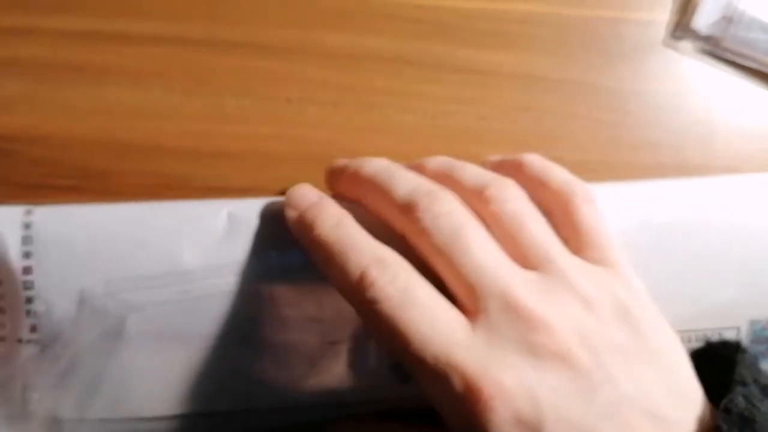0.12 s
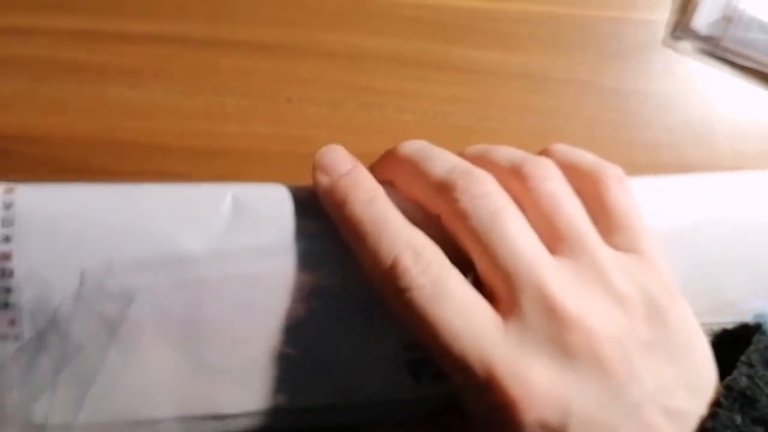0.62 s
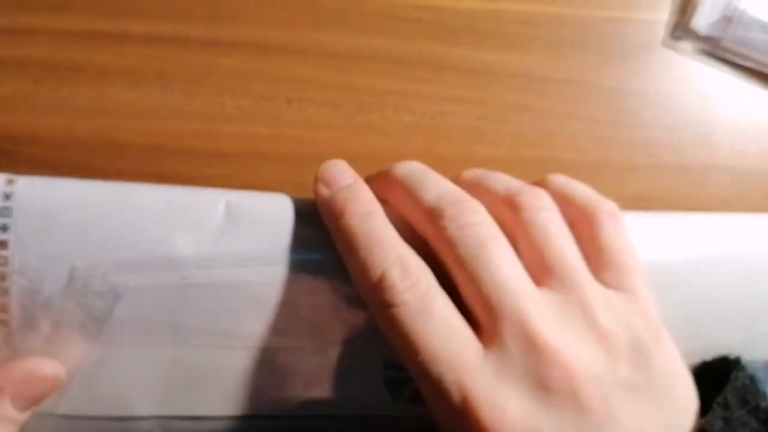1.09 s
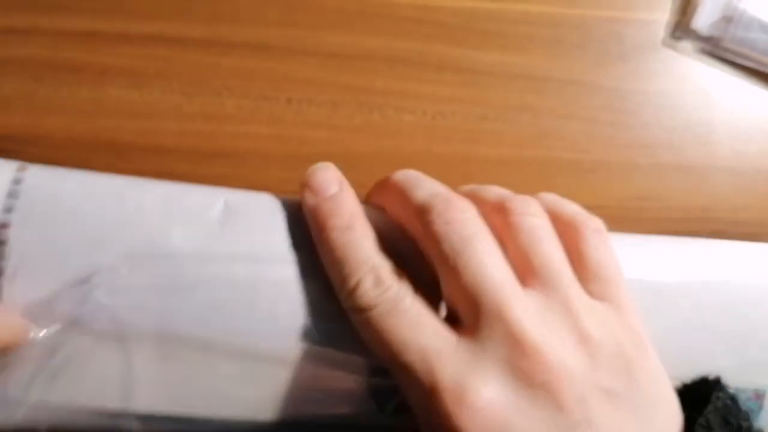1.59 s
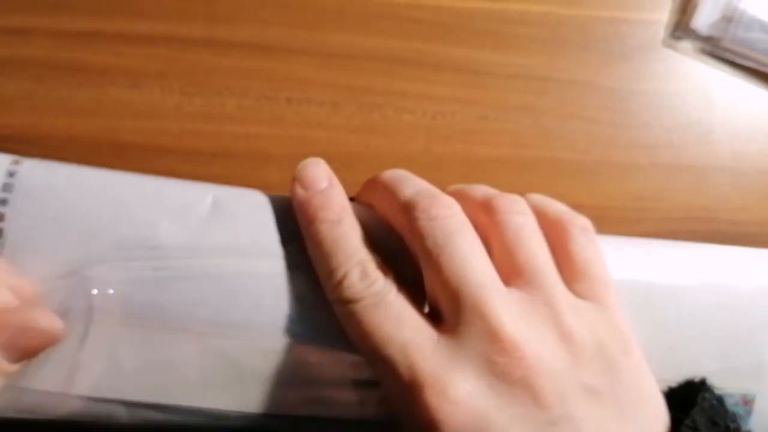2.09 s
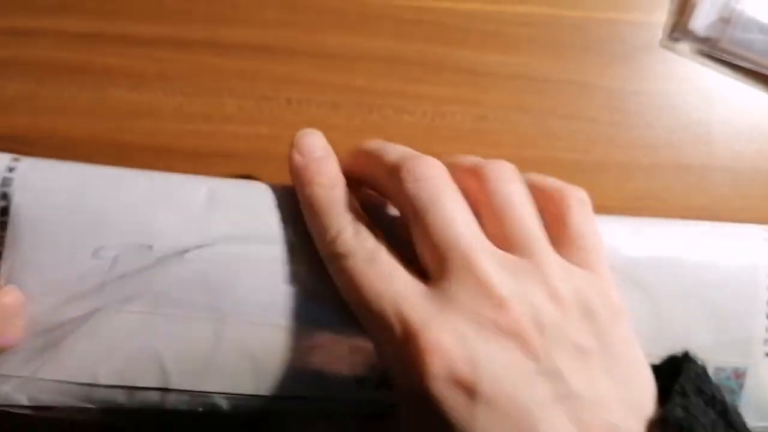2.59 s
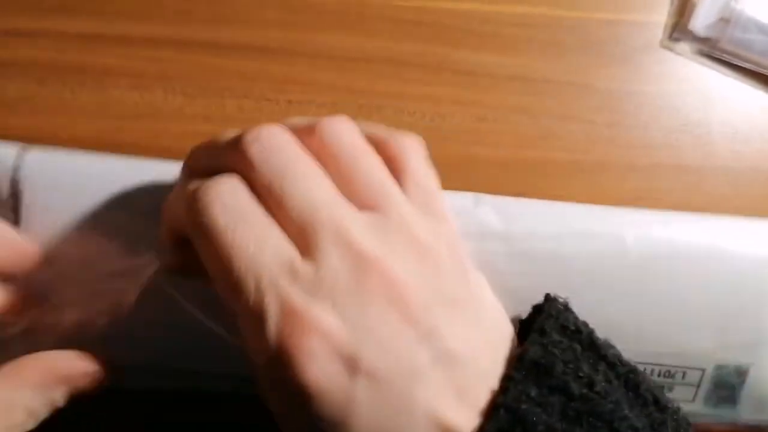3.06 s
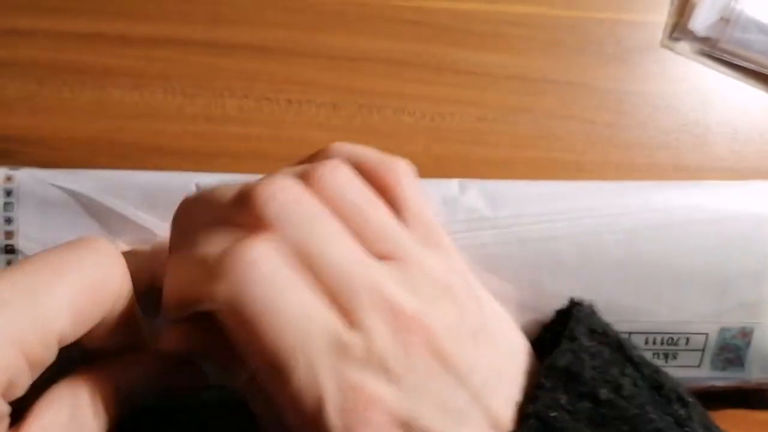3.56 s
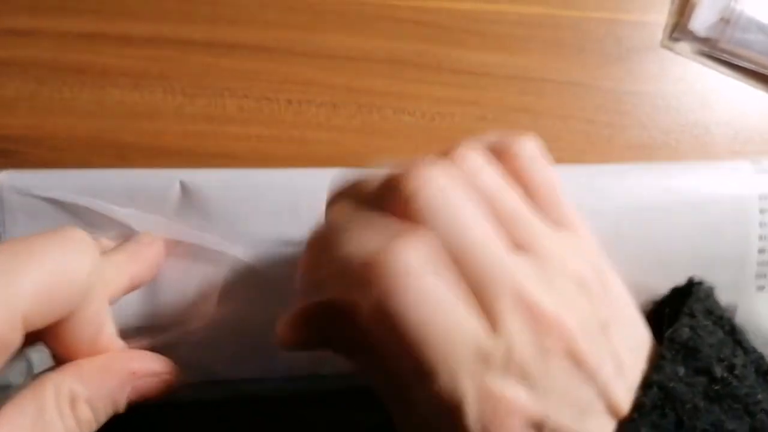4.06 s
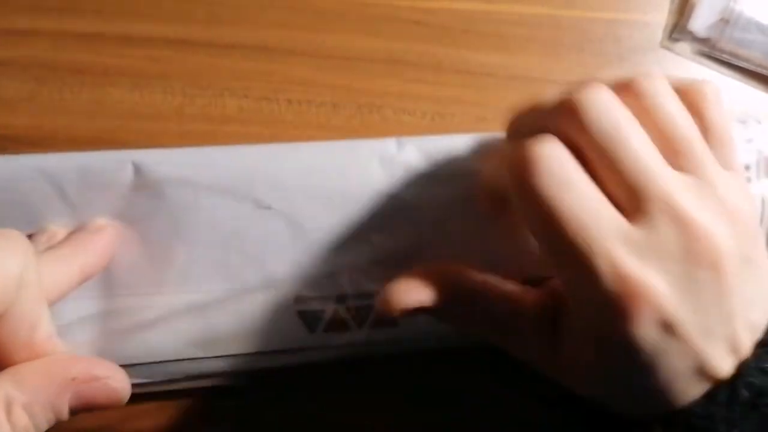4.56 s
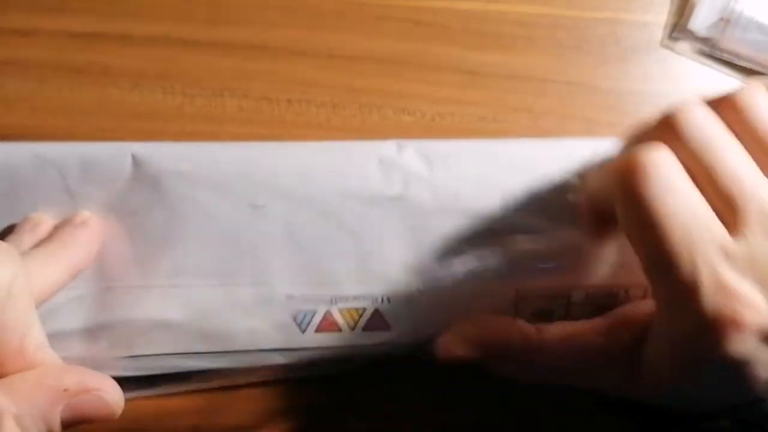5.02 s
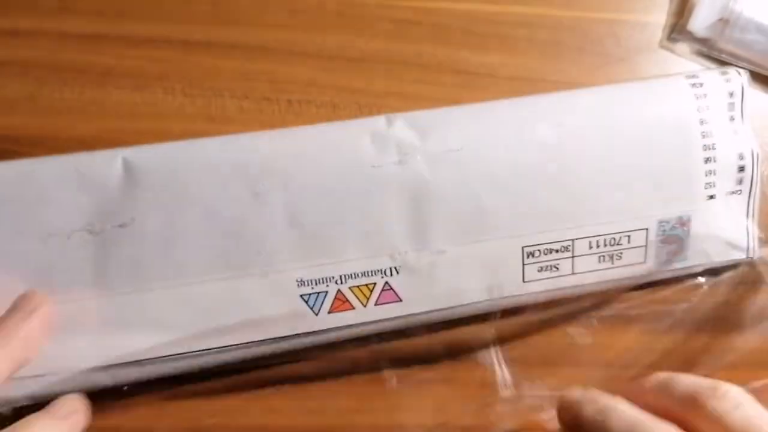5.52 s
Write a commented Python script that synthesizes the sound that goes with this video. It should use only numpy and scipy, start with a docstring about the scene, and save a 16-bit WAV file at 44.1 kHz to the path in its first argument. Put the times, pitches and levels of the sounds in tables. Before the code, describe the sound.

Close stereo pickup of two hands working thin plastic film around a rolled canvas on a wooden desk. Crinkling starts at once in strong, snappy bursts, thins briefly after one second, then returns. A single hard knock lands just before the middle, and the rustling carries on busily to the end over faint room hush and low desk rumble.

```python
"""Two hands unwrap thin plastic film from a rolled canvas on a wooden desk, close to a pair of microphones.
Squeezes crackle from the first moment as clumped clicks, with creases that snap as short rings and noise,
dull pops where fingers dent the roll, low desk rumble and soft thuds of a few low cycles. At 2.44 s a knock
rings as decaying tones and jolts the left microphone. The crackle goes on past a last thud at 5.49 s.
Filtered noise is the room's hush, and sparse echoes follow the film and the knock."""
import sys
import numpy as np
from scipy import signal
from scipy.io import wavfile
from scipy.ndimage import uniform_filter1d

SR = 44100
rng = np.random.default_rng(int(sys.argv[2]) if len(sys.argv) > 2 else 0)


def transcribe(signal):
    """Save signal, clipped to [-1, 1], as a 16-bit WAV file at the path in sys.argv[1]."""
    frames = np.atleast_2d(signal).T
    limited = np.clip(frames, -1, 1)
    pcm = np.round(limited * 32767).astype(np.int16)
    wavfile.write(sys.argv[1], SR, pcm)


def boost_factor(decibels):
    """Convert a level in decibels to a linear amplitude factor."""
    exponent = np.asarray(decibels, float) / 20
    return 10 ** exponent


N = 249165


def evened(x):
    """Scales to rms 1."""
    return x / np.sqrt(np.mean(x ** 2) + 1e-20)


def read(points, hz):
    """Reads a table on a log-frequency axis."""
    f, value = np.transpose(points)
    return np.interp(np.log(hz + 1), np.log(f + 1), value)


def coloured(x, points, share=1):
    """Filters by a spectrum in dB at minimum phase, so nothing rings before an attack."""
    db = share * np.maximum(read(points, abs(np.fft.fftfreq(4096, 1 / SR))), -100)
    log_gain = np.log(boost_factor(db))
    minimum_phase = -signal.hilbert(log_gain).imag
    taps = np.fft.ifft(np.exp(log_gain + 1j * minimum_phase)).real[:2048]
    return signal.oaconvolve(x, taps[None], axes=-1)[:, :x.shape[1]]


def add(mix, at, sound):
    """Adds a sound at a sample index."""
    part = mix[max(at, 0):][:len(sound)]
    part += sound[:len(part)]


def burst(hz, cycles, phase):
    """A few cycles that swell and die, peak 1; the swell lasts the given cycles."""
    turns = np.arange(600) / SR * hz
    swell = (turns / cycles * np.exp(1 - turns / cycles)) ** 2
    shape = swell * np.sin(2 * np.pi * (turns + phase))
    return shape / abs(shape).max()


# The busy hand wandering along the roll.
# Each row: time in seconds, left over right in dB, lateness of the left microphone in ms.
HAND_PATH = [(0, 5.5, 0.088), (.5, 9, .13), (1.1, 5, .11), (2, 4.5, 0.095), (2.6, 3, 0.1), (3.2, 4, 0.096),
             (3.8, 4, 0), (4.3, 4.5, -0.072), (4.8, 2.5, -.14), (5.65, 2.5, -0.16)]


def hand_at(s):
    """Left-right level in dB and left lag in ms for a hand nearer one microphone than the other."""
    times, pan_db, late_ms = np.transpose(HAND_PATH)
    return np.interp(s, times, pan_db), np.interp(s, times, late_ms)


# The grip shifting the note of the hollow roll. Each row: time in seconds, note in Hz.
GRIP_NOTES = [(0, 560), (.6, 505), (.9, 380), (1.5, 356), (2.3, 392), (2.9, 716), (5.65, 746)]


def roll_note(s):
    """Note in Hz of the hollow roll as the grip shifts."""
    return np.interp(s, *np.transpose(GRIP_NOTES))


# Each squeeze or pull of the film. Each row: peak time in seconds, crackle in dB, rise in ms per 10 dB,
# fade in ms per 10 dB, echo of the hollow roll relative to the crackle in dB, before hollow_share.
FILM_SQUEEZES = [(.084, -47, 45, 18, -20), (0.203, -38, 35.5, 67, -15.5), (.28, -47, 20, 38, -9),
                 (.366, -47.5, 14, 39, -20), (0.468, -41, 28, 29, -16), (0.576, -43, 66, 40, -11.5),
                 (.741, -56, 28, 5, -7), (.82, -44.5, 20, 73, -6.5), (.969, -53, 9, 45, -8),
                 (1.03, -55.5, 23, 30, -6.5), (1.16, -61, 12, 35, -14), (1.26, -58.5, 60, 62, -14),
                 (1.35, -48.5, 7, 125, -11), (1.467, -42.5, 50, 34, -8), (1.538, -46.5, 15, 65, -8.5),
                 (1.637, -43.5, 46, 41, -18), (1.715, -39, 37, 38.5, -12.5), (1.918, -47, 98, 57, -16.5),
                 (2.037, -56, 9, 19, -30), (2.103, -48.5, 12, 300, -13.5), (2.242, -49, 19, 20, -13),
                 (2.342, -47.5, 76, 86, -11.5), (2.44, -45, 15, 80, -13.5), (2.66, -53.5, 46, 250, -9.5),
                 (2.776, -49, 10, 46, -8), (2.913, -53.5, 87, 15, -11), (2.989, -50.5, 38, 130, -10.5),
                 (3.151, -42.5, 8.5, 45, -14), (3.299, -55, 137, 26, -9.5), (3.353, -49.5, 31, 212, -11.5),
                 (3.629, -50.5, 246, 65, -6), (3.847, -58, 31, 27, -10), (3.913, -45, 6.5, 102, -8),
                 (4.144, -45.5, 30, 26, -9), (4.256, -50.5, 3, 104, -9.5), (4.392, -43.5, 69, 75, -10),
                 (4.541, -41, 19.5, 35, -12), (4.695, -47, 52, 39, -11.5), (4.797, -43, 74, 39, -11),
                 (4.91, -45, 15, 31, -7.5), (4.94, -44, 36, 40, -13), (5.038, -49.5, 37, 10, -5),
                 (5.09, -50.5, 26, 48, -12), (5.185, -43, 70, 42, -7.5), (5.339, -46.5, 98, 68, -11.5),
                 (5.47, -48, 63, 58, -10.5), (5.549, -45.5, 16, 102, -12.5)]


def effort(rest_db, follow=1, hollow_share=0):
    """Level in dB of the squeezes, which rise, fade and overlap in power; lower follow is slower."""
    ms = np.arange(0, N, 64) / SR * 1000
    power = boost_factor(2 * rest_db)
    for s, db, rise_ms, fade_ms, roll_db in FILM_SQUEEZES:
        before = (s * 1000 - ms) / max(rise_ms, 2)
        after = (ms - s * 1000) / max(fade_ms, 2)
        away = np.maximum(before, after)
        power = power + boost_factor(2 * (db + hollow_share * roll_db - 10 * follow * away))
    return np.interp(np.arange(N) / SR * 1000, ms, 10 * np.log10(power))


# Colour of the room noise ahead of its overall level. Each row: frequency in Hz, relative dB per Hz.
HUSH_COLOUR = [(35, -33), (60, 6), (233, -10.5), (274, -3), (842, -41), (1550, -24), (1950, -2.5),
               (9790, -40), (16000, -45)]


def hush():
    """Steady room noise, filtered independently for each microphone."""
    return boost_factor(-71.5) * evened(coloured(rng.standard_normal((2, N)), HUSH_COLOUR))


# Sparse echoes dying away in the room. Each row: frequency in Hz, 60 dB decay time in seconds.
ROOM_DECAY = [(300, 0.12), (1000, 0.097), (4000, 0.065), (12000, 0.14)]


def room(x):
    """Sparse echoes of random sign from desk and walls; three sets of paths sway at a steady rate."""
    sway_hz, out = 2.3, 0
    sway = 2 * np.pi * sway_hz * np.arange(N) / SR
    for k in range(3):
        taps = np.zeros((2, SR // 2))
        # one echo at a random place in every 20 samples
        at = np.arange(60, SR // 2 - 20, 20) + rng.integers(0, 20, (2, (SR // 2 - 61) // 20))
        np.put_along_axis(taps, at, rng.choice([-1., 1.], at.shape), 1)
        hz, t, z = signal.stft(taps, SR, nperseg=256)
        decay = boost_factor(-60 * t / read(ROOM_DECAY, hz)[:, None])
        tail = signal.istft(z * decay, SR, nperseg=256)[1]
        tail = tail / np.linalg.norm(tail[0])
        fed = x.mean(0) * np.sqrt(2 / 3) * np.cos(sway + k * np.pi / 3)
        out = out + signal.fftconvolve(fed[None], tail, axes=1)[:, :N]
    return out


# Colour of the desk rocking, then of its top humming. Each row: frequency in Hz, relative dB per Hz.
ROCKING_COLOUR = [(12, -20), (30, -1), (48, 1.5), (75, -9), (150, -43)]
HUMMING_COLOUR = [(40, -48), (75, -7), (118, -2), (160, -9.5), (240, -14.5), (400, -43)]
# How hard the hands lean on the desk.
# Each row: time in seconds, rocking in dB, humming in dB, both at a crackle of -50 dB.
HANDS_LEAN = [(0, -68, -50.5), (.15, -86, -77), (.5, -90, -86), (.6, -61, -69), (.74, -60, -74),
              (.8, -70.5, -69.5), (1.3, -77, -80), (1.42, -66, -70), (1.6, -80, -76), (1.9, -86, -70),
              (2.12, -70, -76), (2.35, -91, -86), (2.5, -72, -61), (2.72, -74, -64), (2.9, -78, -90),
              (3.1, -80, -78), (3.2, -80, -59.5), (3.4, -82, -73), (3.55, -76, -63), (4.0, -70, -67),
              (4.5, -72, -61.5), (4.8, -64, -60.5), (5.1, -69, -63.5), (5.4, -69, -64.5), (5.49, -60, -73),
              (5.55, -63, -60), (5.65, -70, -68)]


def desk(effort_db):
    """Low rumble carried through the wood, nearly the same at both microphones."""
    middling_db, follow = -50, 0.61  # desk dB for each dB of squeeze
    s, *levels_db = np.transpose(HANDS_LEAN)
    out = 0
    for lean_db, colour in zip(levels_db, (ROCKING_COLOUR, HUMMING_COLOUR)):
        noise = rng.standard_normal((3, N))
        rumble = evened(coloured(noise[0] + 0.32 * noise[1:], colour))
        level_db = np.interp(np.arange(N) / SR, s, lean_db) + follow * (effort_db - middling_db)
        out = out + boost_factor(level_db) * rumble
    return out


# The roll settling on the desk.
# Each row: time of the middle in seconds, peak of the swell in dB, frequency in Hz.
ROLL_THUDS = [(.02, -51, 128), (.03, -63, 32), (.64, -51.5, 44.7), (1.411, -64, 46), (3.917, -55, 200),
              (5.49, -59, 48)]


def thuds():
    """Soft low swells of a few cycles through the desk, the same at both microphones."""
    t, out = np.arange(N) / SR, 0
    for s, db, hz in ROLL_THUDS:
        swell = np.exp(-((t - s) * hz / 2.3) ** 2)
        out = out + boost_factor(db) * swell * np.sin(2 * np.pi * hz * (t - s))
    return out


# Tones of the knock as they start at the left microphone, ahead of a brief onset.
# Each row: frequency in Hz, level in dB, 60 dB decay time in seconds.
KNOCK_TONES = [(3950, -15, 0.013), (2550, -22, 0.012), (5500, -13, 0.0048), (9340, -14, 0.0051),
               (1600, -27, 0.0093)]


def knock():
    """A hard tick at both microphones; the left diaphragm is pushed aside and creeps back."""
    knock_s, jolt_db, jolt_decay_s = 2.4372, -4, 0.0027
    t, out = np.arange(SR // 2) / SR, np.zeros((2, N))
    tick = sum(boost_factor(db - 60 * t / t60) * np.sin(2 * np.pi * hz * t) for hz, db, t60 in KNOCK_TONES)
    tick *= 1 - np.exp(-t / .00006)
    jolt = boost_factor(jolt_db) * (1 - np.exp(-t / .0001)) * np.exp(-t / jolt_decay_s)
    jolt -= boost_factor(-29.5) * (1 - np.exp(-t / 0.024)) * np.exp(-t / 0.1)  # slow undershoot
    at = round(knock_s * SR)
    add(out[0], at - 6, -tick)
    add(out[0], at + 4, jolt)
    add(out[1], at - 10, -boost_factor(-11.5) * burst(3570, 0.52, 0.16))
    add(out[1], at, boost_factor(-8.5) * tick)
    add(out[1], at + 4, -boost_factor(-26.0) * jolt)  # a trace of the jolt, inverted
    return out


# Broad resonances of the hollow roll, for one pass.
# Each row: frequency in Hz, width in Hz, level in dB.
ROLL_RESONANCES = [(338.6, 210, 1.5), (494, 230, -2.5), (732, 234, 2), (1056, 270, -5)]


def hollow(x):
    """The canvas roll rings at a few broad resonances."""
    out = 0
    for hz, width, db in ROLL_RESONANCES:
        out = out + boost_factor(db) * signal.lfilter(*signal.iirpeak(hz, hz / width, SR), x)
    return out


def crackle(per_s, spread_db, clump_db):
    """Countless tiny creases clumped in time at the hand, each reaching one microphone first."""
    clumps = evened(uniform_filter1d(rng.standard_normal(N), 260))
    size = boost_factor(spread_db * np.minimum(rng.exponential(1, N), 5) + clump_db * clumps)
    clicks = size * rng.choice([-1., 1.], N) * (rng.random(N) < per_s / SR)
    _, late_ms = hand_at(np.arange(N) / SR)
    half_lag = late_ms * SR / 2000 + 2.5 * rng.standard_normal(N)  # samples
    out = np.zeros((2, N))
    for ear, side in enumerate((1, -1)):
        at = np.arange(N) + np.round(side * half_lag).astype(int)
        np.add.at(out[ear], np.clip(at, 0, N - 1), clicks)
    return out


# Ringing notes in Hz of the crackle: small creases ring higher than large ones.
CREASE_NOTES = [1740, 3160, 5760, 9700]
# Filter on the sum of those creases, ahead of the sheen. Each row: frequency in Hz, gain in relative dB.
FILM_COLOUR = [(530, -24), (900, -8.5), (1420, -2.5), (1680, -3), (2360, 0), (2790, -1), (4310, -3),
               (7310, -4), (8450, -9), (9420, -3.5), (14500, -23), (16000, -33)]


def crumple(level_db):
    """Crackle of the film, brighter when crumpled harder, and its duller echo in the roll."""
    film = 0
    for hz in CREASE_NOTES:
        clicks = crackle(1000, 1.9, 3.75)
        ring = signal.lfilter(*signal.iirpeak(hz, .9, SR), clicks)
        film = film + 0.5 * clicks + ring * np.sqrt(9000 / hz)
    film = evened(coloured(film, FILM_COLOUR))
    sheen = signal.filtfilt(*signal.butter(2, 7000, "high", fs=SR), film)
    film = film + sheen * (boost_factor(0.26 * (level_db + 57.5)) - 1)
    # the roll's echo swells and fades more slowly than the crackle
    roll_db = effort(rest_db=-71.5, follow=0.8, hollow_share=0.91)
    roll = evened(hollow(hollow(crackle(1500, 2.64, 4.0))))
    pan_db, _ = hand_at(np.arange(N) / SR)
    return boost_factor(np.outer([.5, -.5], pan_db)) * (boost_factor(level_db) * film + boost_factor(roll_db) * roll)


# Fingers denting the hollow roll.
# Each row: time in seconds, peak in dB ahead of the pan and the colour shared with the snaps.
FINGER_POPS = [(.1395, -46), (.161, -42.5), (.1997, -37), (.2687, -36.5), (.3866, -47), (.4258, -46),
               (.4765, -35), (.5463, -38), (.5778, -44), (.8221, -40), (.8869, -37), (1.3768, -38),
               (1.4474, -45), (1.4658, -36), (1.6286, -45), (2.7705, -40), (2.9974, -41), (3.1516, -35),
               (3.1991, -46), (3.2703, -30.5), (3.3427, -44), (3.3766, -50), (3.7824, -39), (3.8446, -43),
               (3.9071, -43), (3.9895, -37.5), (4.1032, -39), (4.4275, -37), (4.537, -38), (4.6452, -39.5),
               (4.73, -39), (4.7696, -45), (4.8594, -39), (4.9229, -36), (5.1751, -36), (5.554, -47)]


def pops():
    """The hollow roll gives a short dull pop where a finger dents it."""
    note_scatter = 0.2  # each dent lands up to this share off the roll's note
    out = np.zeros((2, N))
    for (s, db), (phase, note) in zip(FINGER_POPS, rng.random((len(FINGER_POPS), 2))):
        pan_db, late_ms = hand_at(s)
        pop = boost_factor(db) * burst(roll_note(s) * (1 + note_scatter * (2 * note - 1)), 1.4, phase)
        for ear, side in enumerate((1, -1)):
            at = round((s - .00198 + side * late_ms / 2000) * SR)
            add(out[ear], at, boost_factor(side * pan_db / 2) * pop)
    return out


def small_snaps(level_db):
    """Lesser creases flip at random, their level following the crumpling around them."""
    per_s, over_db, spread_db, pan_spread_db = 18, 7.5, 5.5, 6
    low_hz, high_hz = 1400, 5000
    at, size, pitch, edge, side = rng.random((round(per_s * N / SR), 5)).T
    s = at * (N - 1) / SR
    ring_db = level_db[(s * SR).astype(int)] + over_db + spread_db * (2 * size - 1)
    ring_hz = low_hz * (high_hz / low_hz) ** pitch
    edge_db = ring_db - 1.5 + 2 * spread_db * (2 * edge - 1)
    pan_db = hand_at(s)[0] + pan_spread_db * (2 * side - 1)
    return list(zip(s, ring_db, ring_hz, edge_db, pan_db))


# The clearest single creases flipping over, levels ahead of pan and colour. Each row: time in seconds,
# ring peak in dB, ring in Hz, crisp edge in dB (played 2 dB higher), left over right in dB.
CLEAR_SNAPS = [(.077, -31.5, 2630, -45, 5), (.0863, -29.5, 2420, -33, 1.5), (.161, -32, 2560, -32, 8),
               (.1943, -22.5, 2360, -39, 5), (.1997, -39, 2940, -24, 7), (.206, -26, 2100, -36, 5),
               (.2167, -27, 1580, -35, 12), (.2345, -21, 2130, -31, 14), (.26, -31, 1670, -31, 2),
               (.2687, -17.5, 1900, -27, 12), (.2957, -27.5, 2300, -43, 4), (.3576, -39, 5100, -27.5, 7),
               (.3724, -35, 2850, -39, 10), (.4258, -28.5, 2130, -48, 14), (.4412, -30, 5000, -31, 9),
               (.4542, -36.5, 1210, -52, 15), (.4765, -23.5, 1200, -28, 9.5), (.526, -31.5, 4630, -26.5, 7),
               (.538, -32, 1400, -35, 18), (.5463, -24.5, 4650, -39, 5), (.5714, -27.5, 1540, -29, 11),
               (.5778, -23.5, 1250, -23, 2), (.673, -38.5, 1970, -40.5, 8), (.7045, -44.5, 1220, -52, 14),
               (.7367, -40, 2090, -32.5, 6.5), (.7776, -25.5, 1850, -30.5, 15.5),
               (.8221, -28, 1710, -35, 13), (.8543, -36, 1450, -52, 7.5), (.8707, -30, 1420, -27.5, 2),
               (.8869, -34, 1740, -39, 9), (.9312, -40, 2010, -44, 5), (.9674, -32.5, 1790, -32, 5),
               (1.0221, -37, 2690, -37.5, 3), (1.1493, -39.5, 1380, -35.5, 4),
               (1.164, -37, 5500, -34.5, -1), (1.2266, -43, 1970, -44, 8.5), (1.2717, -56, 4900, -30, -1),
               (1.3061, -52, 4870, -37, 2), (1.3286, -36, 1520, -47, 3), (1.3419, -35.5, 1820, -30, 2),
               (1.3768, -37.5, 920, -29.5, -3), (1.4474, -36, 2800, -31, 2), (1.4658, -26, 2970, -23, 2),
               (1.5295, -32, 3960, -50, 4), (1.534, -30.5, 4050, -33, 8), (1.5604, -39, 2670, -27, 1),
               (1.5947, -46, 1790, -27.5, 6), (1.6286, -28, 1470, -23, 3), (1.6406, -16, 3820, -39, 6),
               (1.7027, -41, 2260, -29, 0), (1.7113, -31, 3020, -33, 9), (1.7252, -26, 2250, -32, -2),
               (1.8287, -34, 3780, -29.5, 6.5), (1.89, -28.5, 3900, -27, 5), (1.9116, -36, 4940, -41, 6),
               (1.9617, -40, 4800, -31, 12), (2.0327, -30.5, 5230, -29.5, 5), (2.099, -31, 3500, -36, 3),
               (2.1345, -31, 2980, -51, 1), (2.174, -31, 2600, -30.5, -1), (2.2398, -27, 3200, -33.5, 0),
               (2.313, -36, 2860, -28, 16), (2.4488, -27, 4160, -44, -1), (2.6045, -39, 2540, -48, 1.5),
               (2.6526, -36.5, 2300, -33.5, 7), (2.6905, -33, 3900, -32, 4), (2.733, -32.5, 5050, -34, 6),
               (2.7705, -31, 5000, -32.5, 1), (2.8494, -37.5, 3530, -33, 7), (2.8964, -31.5, 2800, -53, 4),
               (2.9017, -33.5, 4630, -39, 0), (2.9172, -36, 5000, -40, 8), (2.9567, -28.5, 2600, -37, 5),
               (2.9852, -29, 4720, -46, 1.5), (2.9974, -30.5, 4870, -37, -3), (3.056, -36.5, 2920, -38, -8),
               (3.0692, -35, 2800, -31, 0), (3.0808, -35, 3170, -41, -2), (3.1185, -36, 2680, -40, -3),
               (3.1516, -25.5, 4070, -24.5, -3.5), (3.2146, -35, 4000, -33.5, 0),
               (3.3027, -39, 3600, -33, -5), (3.3427, -33, 3280, -37, -1), (3.3556, -37, 3150, -32, -4),
               (3.3659, -31, 4900, -34, 7), (3.3766, -31, 5500, -40, 5), (3.4012, -29.5, 2210, -31, 4),
               (3.5182, -34.5, 3300, -44.5, -1), (3.5808, -35, 2020, -38, -3),
               (3.5856, -33.5, 5000, -44, 8), (3.6268, -39, 4370, -39, 0), (3.669, -36, 2550, -37, 1),
               (3.779, -38.5, 3600, -56, 4), (3.7993, -44, 3430, -44, 4), (3.8324, -43, 3000, -42, 0),
               (3.8377, -34.5, 3790, -42, -4), (3.8446, -36.5, 3680, -42, 6), (3.871, -37, 5000, -54, 2),
               (3.9071, -15, 2760, -41, 3), (3.9895, -30.5, 3320, -35.5, 5), (4.0276, -38.5, 4900, -52, 8),
               (4.1032, -39.5, 1740, -43, 7), (4.1249, -33, 2340, -37, -1), (4.1399, -34.5, 3800, -37, -1),
               (4.161, -35, 3880, -42, 0), (4.2378, -35, 3930, -58, 0), (4.262, -31.5, 3430, -44, 1),
               (4.2935, -36, 3600, -37, 3), (4.3226, -40, 2500, -32, 3), (4.3538, -30, 4430, -44, 4.5),
               (4.375, -32, 4200, -45, 4), (4.385, -28, 3760, -38, 3), (4.404, -45, 3810, -30, -4),
               (4.4084, -31, 3010, -40, 7), (4.4275, -42, 4110, -30, 5), (4.4712, -37, 3500, -56, 12),
               (4.519, -48, 1870, -40, 3.5), (4.5282, -31, 2220, -31, 3), (4.5522, -30.5, 4950, -30, 1),
               (4.6545, -33.5, 3570, -44, 3.5), (4.73, -30.5, 3750, -34, 3), (4.7696, -30.5, 2960, -35, 1),
               (4.8882, -30, 2360, -38, 0), (4.9229, -30, 2750, -32, 2), (4.944, -28.5, 4970, -34, 2),
               (5.0403, -32.5, 2840, -44, 5), (5.07, -30, 2860, -48, 7), (5.083, -41, 5000, -29, 1),
               (5.1175, -28.5, 3330, -34.5, 10.5), (5.1321, -32, 3020, -33, 0), (5.1507, -32, 3730, -45, 6),
               (5.1751, -22, 2900, -27, 7), (5.1886, -26.5, 4180, -42, 6), (5.316, -33, 2220, -52, 5),
               (5.3533, -28.5, 2180, -35, 4), (5.4223, -33, 4420, -51, 3), (5.554, -25.5, 1600, -35, 6),
               (5.6036, -33.5, 4540, -31.5, -3)]


def snaps(rows):
    """Each crease gives a short ring, a crisp rattle of noise and a pop of the hollow roll."""
    t = np.arange(600) / SR
    out = pops()  # the finger dents share the colour below
    noise, luck = rng.standard_normal((len(rows), 3, 600)), rng.random((len(rows), 4))
    for (s, ring_db, hz, edge_db, pan_db), n, (phase, lag, roll_phase, size) in zip(rows, noise, luck):
        rattle = 1.04 * n[0] + 0.79 * n[1:]  # partly shared by the two microphones
        crisp_band = signal.butter(2, [4800, 8000 + 8000 * phase], "band", fs=SR)
        crisp = signal.lfilter(*crisp_band, rattle) * t * np.exp(-t / 0.00082)
        crisp /= abs(crisp).max()
        after = signal.lfilter(*signal.iirpeak(hz, 1.2, SR), rattle)
        after = after * (1 - np.exp(-t / 0.00062)) * np.exp(-t / .003)
        # the strongest creases ring for fewer cycles, with less rattle beside the ring
        loud_db = max(ring_db + 28, 0)
        cycles = .8 + .8 * size - 0.02 * loud_db
        ring = burst(hz, cycles, phase)
        body = ring + boost_factor(1 - 0.58 * loud_db) * after
        pop = burst(roll_note(s), 1.0, roll_phase)
        _, late_ms = hand_at(s)
        for ear, side in enumerate((1, -1)):
            at = s * SR + side * (late_ms * SR / 2000 + 2.2 * (lag - .5))
            gain = boost_factor(side * pan_db / 2)
            add(out[ear], round(at - cycles * SR / hz), gain * boost_factor(ring_db) * body[ear])
            add(out[ear], round(at - .0007 * SR), gain * boost_factor(edge_db + 2) * crisp[ear])
            add(out[ear], round(at - 0.0018 * SR), np.sqrt(gain) * boost_factor(ring_db - 22.5) * pop)
    return coloured(out, [(80, -41), (250, -6.5), (9500, -0.5), (12000, -6), (16000, -15.5)])


def scene():
    """Film sounds with their echoes, desk rumble, thuds, knock and room noise."""
    level_db = effort(rest_db=-64)  # the film lying still
    film = snaps(CLEAR_SNAPS + small_snaps(level_db)) + crumple(level_db)
    blow = knock()
    wall = boost_factor(-27) * np.roll(blow[1], round(0.012 * SR))  # the knock comes back from a wall
    echoes = boost_factor(-5.5) * room(film + boost_factor(2.5) * blow[1] + wall)
    return hush() + desk(level_db) + thuds() + blow + wall + echoes + film


# How the two microphones differ, ahead of each one's share. Each row: frequency in Hz, left over right in dB.
MICROPHONE_TILT = [(200, 0), (5000, -1.5), (9000, 3.5), (12000, -7), (16000, 0)]


def microphones(dry):
    """Each microphone's own colour: a small share of the tilt on the left, most of it inverted on the right."""
    left = coloured(dry[:1], MICROPHONE_TILT, share=0.15)
    right = coloured(dry[1:], MICROPHONE_TILT, share=-0.92)
    return np.vstack([left, right])


def band_limit(x):
    """A steep low-pass at the top of the band."""
    return signal.sosfilt(signal.butter(12, 16510, fs=SR, output="sos"), x)


def record(dry):
    """The close pair of microphones picks up the scene."""
    mix = microphones(dry)
    return band_limit(mix)


dry = scene()
out = record(dry)
transcribe(out)
```